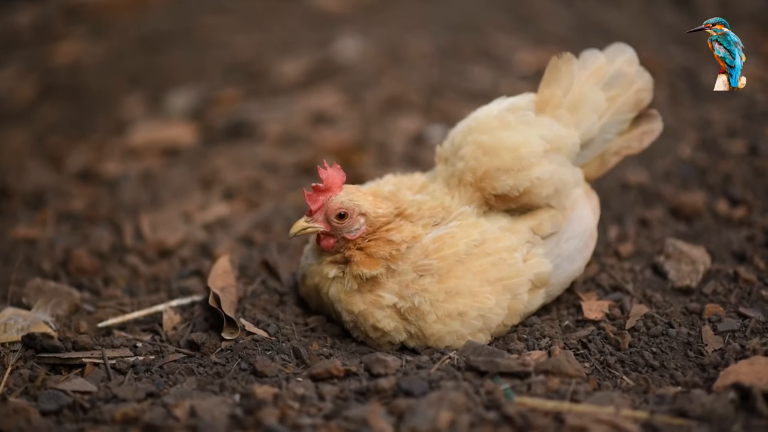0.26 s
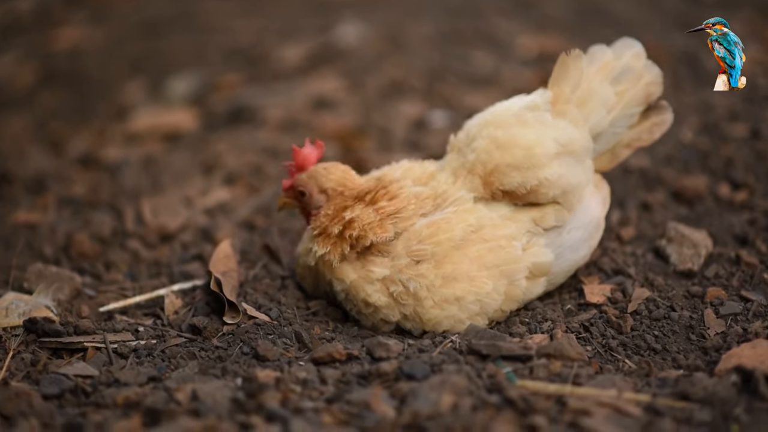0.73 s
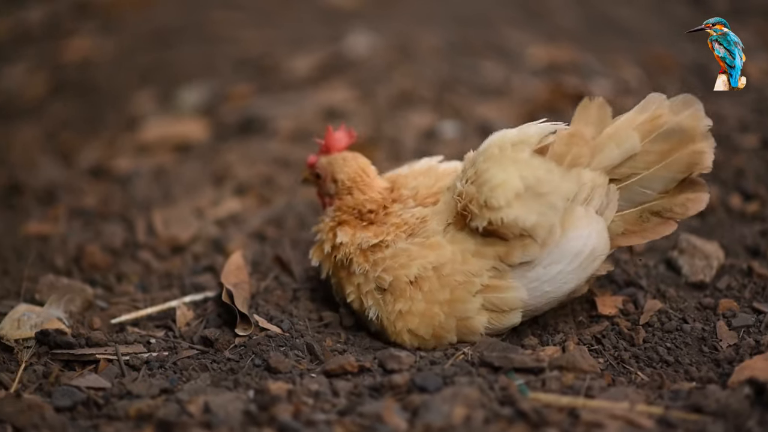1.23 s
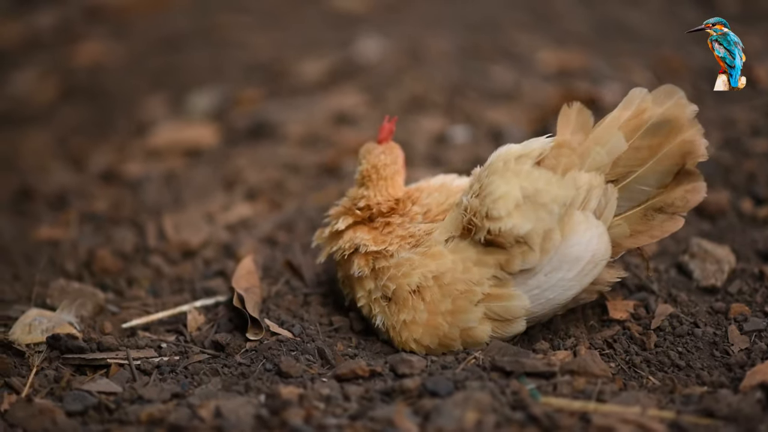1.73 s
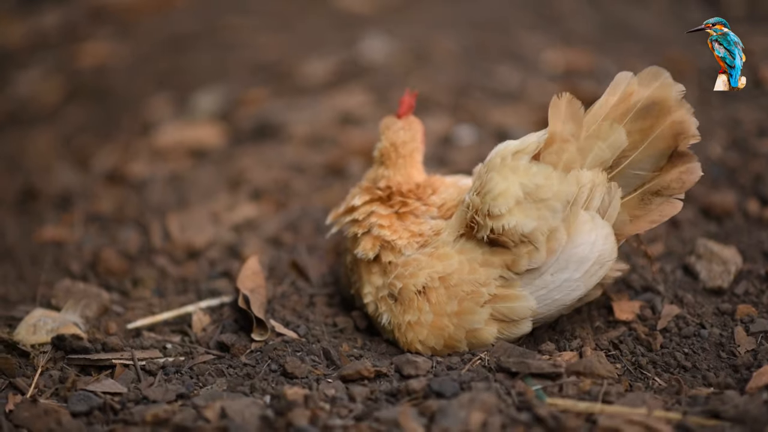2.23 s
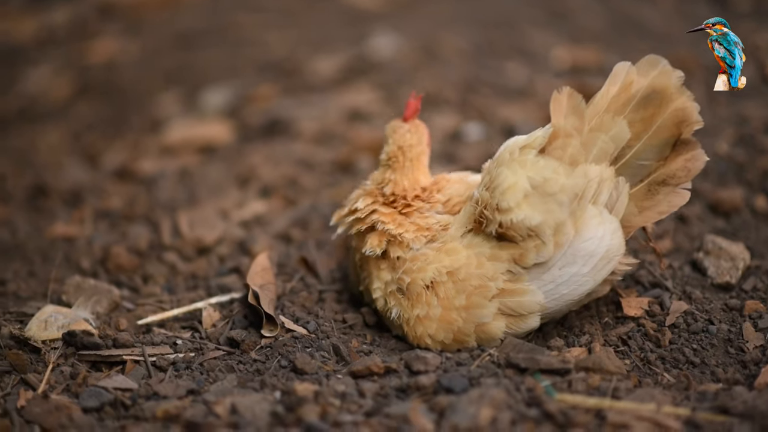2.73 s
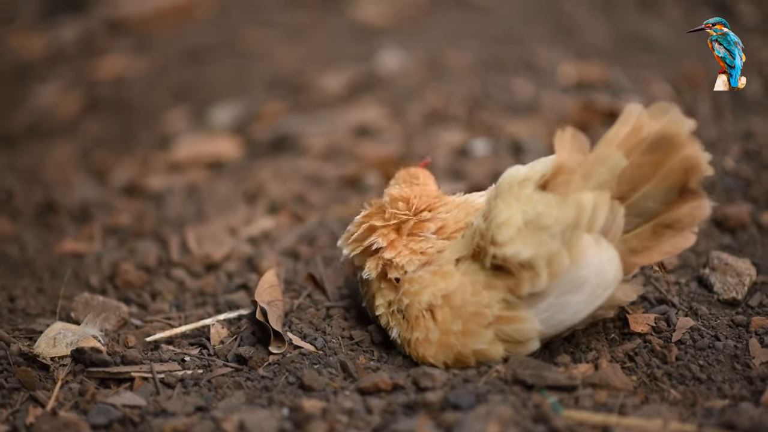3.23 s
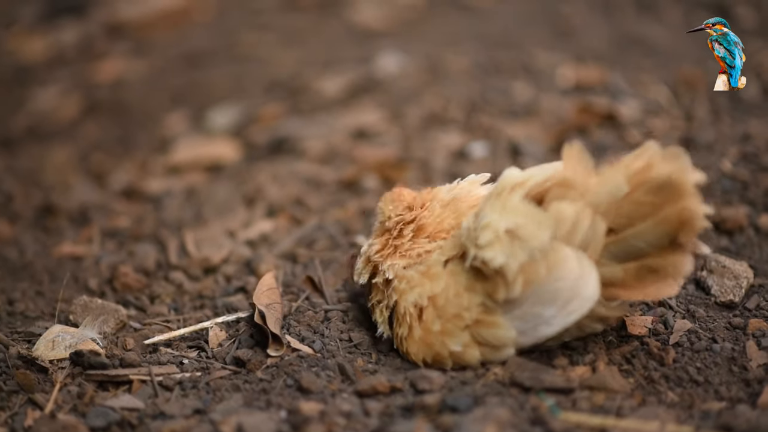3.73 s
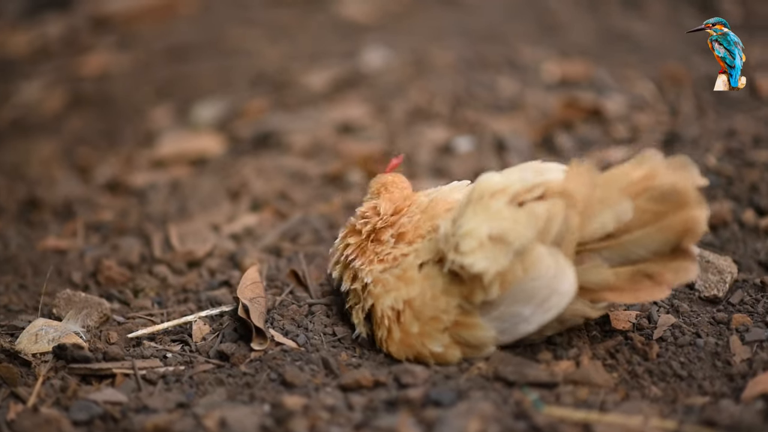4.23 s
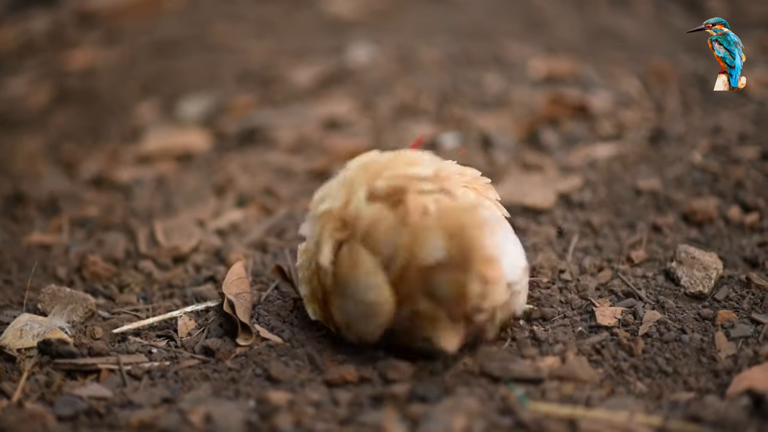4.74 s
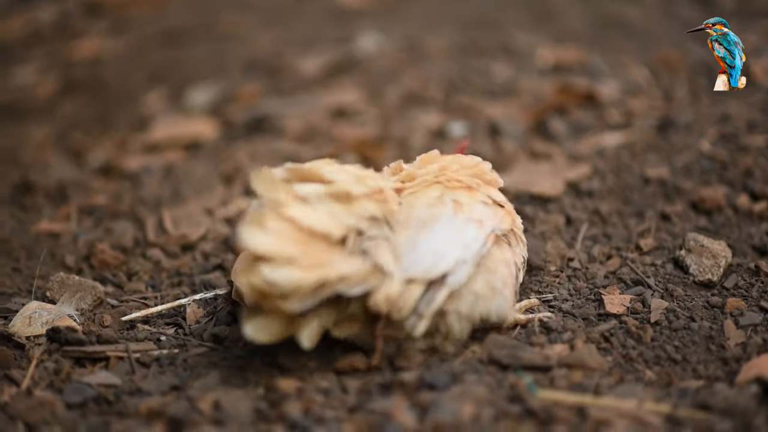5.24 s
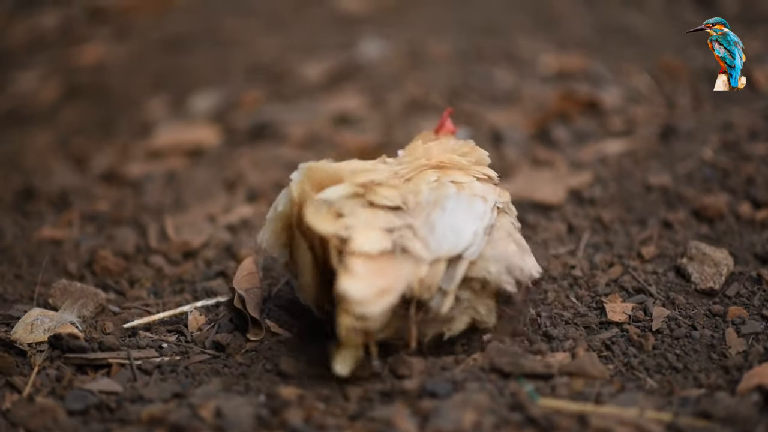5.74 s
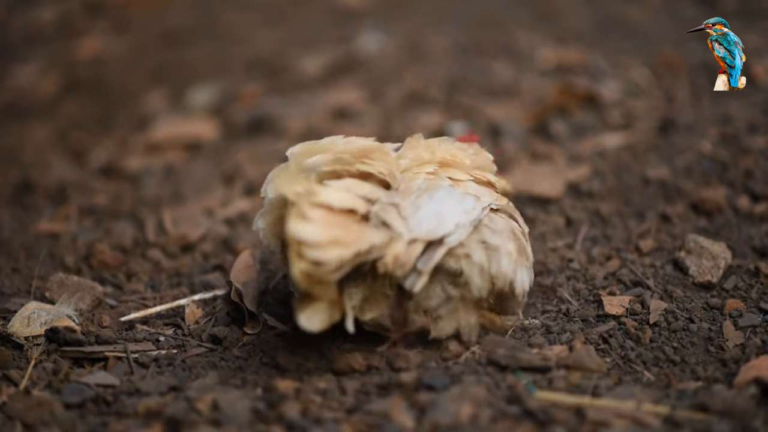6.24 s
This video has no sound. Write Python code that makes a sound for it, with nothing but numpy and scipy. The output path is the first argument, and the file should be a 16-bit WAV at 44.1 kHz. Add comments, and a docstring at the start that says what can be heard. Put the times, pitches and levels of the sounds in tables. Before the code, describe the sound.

A distant hen wails thinly, then a near hen gives four harsh strained squawks, followed by quiet clucks and feathers rustling in dry soil outdoors.

```python
"""Chickens in a farmyard

A near hen squawks: a pulse-driven syrinx flips between a rasp and a pure held note, ringing her throat.
A thinner-voiced bird further off calls first and last, from the same mechanism.
Soft clucks and far cheeps are short harmonic notes; feathers shuffling in dry soil are shaped noise.
Calls echo around the yard, over a faint outdoor rumble of filtered noise."""
import sys
import numpy as np
from scipy import signal
from scipy.fft import rfft, irfft, next_fast_len
from scipy.io import wavfile

SR = 44100
rng = np.random.default_rng(int(sys.argv[2]) if len(sys.argv) > 2 else 0)


def master_out(mix):
    """Clip the mix to full scale and print it as 16-bit PCM to the path in sys.argv[1]."""
    frames = np.transpose(np.atleast_2d(mix))
    ceiling = np.clip(frames, -1, 1)
    pcm = np.round(ceiling * 32767).astype(np.int16)
    wavfile.write(sys.argv[1], SR, pcm)


N = 285327
TIME = np.arange(N) / SR
CUTOFF_HZ = 15600


def from_db(db):
    """Decibels to gain."""
    return 10 ** (np.asarray(db) / 20)


def rms_one(x):
    """Scale to unit power."""
    return x / np.sqrt(np.mean(x ** 2) + 1e-20)


def in_time(rows, t):
    """Columns of a curve, interpolated at times t."""
    s, *columns = np.transpose(rows)
    return [np.interp(t, s, c) for c in columns]


def at_hz(rows, hz):
    """Columns of a spectrum, interpolated over log frequency."""
    points, *columns = np.transpose(rows)
    return [np.interp(np.log(hz + 1e-3), np.log(points), c) for c in columns]


def filtered(x, response):
    """Filter by a response given as a function of frequency."""
    size = next_fast_len(x.shape[-1] + 4096)
    spectrum = rfft(x, size) * response(np.fft.rfftfreq(size, 1 / SR))
    return irfft(spectrum, size)[..., :x.shape[-1]]


def drift(rate_hz, size):
    """Low-passed noise of unit power."""
    return rms_one(filtered(rng.standard_normal(size), lambda f: 1 / (1 + (f / rate_hz) ** 2)))


def local_rms(x, rate_hz):
    """Running level, following changes up to a given rate."""
    power = filtered(x ** 2, lambda f: np.exp(-(f / rate_hz) ** 2))
    return np.sqrt(np.abs(power) + 1e-12)


def evened(x, rate_hz):
    """Even out the bursts in a stereo sound, then hold its centre near level 1."""
    x = x / local_rms(x, rate_hz).mean(0)
    return x / local_rms(x.mean(0), 14)


# two microphone ports: freq_hz, left_lead_rad, left_minus_right_db
PORT_RESPONSE = [(300, 0, 0), (750, .2, 3.5), (1050, .55, 7), (1900, 1.8, 6.5), (2600, 1.6, 4),
                 (4300, 3.3, -.5), (5300, 4.7, 1), (6600, 6.1, 2), (9000, 6.6, 5), (12500, 6.9, 7.5)]


def ports(f):
    """Left and right response to a sound from the front, the difference split evenly."""
    lead_rad, balance_db = at_hz(PORT_RESPONSE, f)
    return (from_db(balance_db) * np.exp(1j * lead_rad)) ** np.array([[.5], [-.5]])


# diffuse sound: freq_hz, left_right_likeness (1 = identical)
DIFFUSE_LIKENESS = [(130, 1), (300, 1), (640, 0.96), (1400, 0.13), (3100, 0.066), (7000, 0.33), (15000, 1)]


def diffuse(size):
    """Stereo white noise from all around; likeness splits its power between mid and side."""
    def likeness(f):
        return np.clip(at_hz(DIFFUSE_LIKENESS, f)[0], -1, 1)

    mid = filtered(rng.standard_normal(size), lambda f: np.sqrt(1 + likeness(f)))
    side = filtered(rng.standard_normal(size), lambda f: np.sqrt(1 - likeness(f)))
    return np.array([mid + side, mid - side])


def harmonics(turns, pitch_hz, count=24):
    """Pulse train as equal harmonics, kept below the top cut."""
    return sum(np.cos(2 * np.pi * k * turns) * (k * pitch_hz < CUTOFF_HZ) for k in range(1, count + 1))


def throat(modes, f):
    """Steep-sided resonances; each one delays its band and smears the pulses."""
    detuned = [(f - hz) / (0.52 * width_hz) for hz, width_hz, db in modes]
    power = sum((from_db(db) / (1 + d ** 2)) ** 2 for (hz, width_hz, db), d in zip(modes, detuned))
    return np.sqrt(power) * np.exp(-2j * sum(np.arctan(d) for d in detuned))


EDGE_HZ = 5100   # body of a call below, treble edge above
BEAK_SLOPE = 7.5   # exponent of the bass cut in power


def squawk(voice, effort, modes, beak_hz, jitter, doubling, hiss, flutter_db, waver, steady_hz):
    """One call: the syrinx swings cleanly or breaks into chaotic pulses, and both ring the throat."""
    start_s, end_s = effort[0][0], effort[-1][0]
    span = (TIME > start_s - .005) & (TIME < end_s + .03)
    t = TIME[span]
    pitch_hz, rough = in_time(voice, t)
    rough = np.clip(rough, 0, 1)
    level_db, edge_db = in_time(effort, t)
    pitch_hz = pitch_hz * (1 + (0.0004 + waver * rough) * drift(90, len(t)))
    clean = harmonics(np.cumsum(pitch_hz) / SR, pitch_hz)

    # rasp: the period stumbles, strong and weak pulses alternate, air hisses through each opening
    turns = np.cumsum(pitch_hz * (1 + jitter * drift(350, len(t)))) / SR
    pulses = rms_one(harmonics(turns, pitch_hz)) * (1 + doubling * np.cos(np.pi * turns))
    breath = hiss * diffuse(len(t)) * (1 + np.cos(2 * np.pi * turns))
    rasp = (pulses + breath) * from_db(flutter_db * drift(500, len(t)))

    out = np.zeros((2, N))
    # strain brightens the treble edge independently of the body
    for slope, band_db in ((16, level_db), (-16, level_db + edge_db)):
        def colour(f):
            return throat(modes, f) * ports(f) / np.sqrt(1 + ((f + 1) / EDGE_HZ) ** slope)

        tone = evened(filtered(clean, colour), steady_hz)
        noise = evened(filtered(rasp, colour), steady_hz)
        out[:, span] += from_db(band_db) * (np.sqrt(1 - rough ** 2) * tone + rough * noise)
    # a beak is too small to radiate bass
    out[:, span] = filtered(out[:, span], lambda f: 1 / np.sqrt(1 + (beak_hz / (f + 1)) ** BEAK_SLOPE))
    return out * np.interp(TIME, [start_s - .005, start_s, end_s, end_s + 0.023], [0, 1, 1, 0])


ONSET_DB, RELEASE_DB = 26, 24   # depth of the swell and of the dying


def envelope(start_s, length_s, attack_s, release_s, fade_db_per_s):
    """A call swells, drifts in level while held, then dies: its times and its level in dB."""
    age_s = np.arange(0, length_s + release_s, .001)
    swell = np.clip(1 - age_s / attack_s, 0, 1) ** 2
    dying = np.maximum(age_s - length_s, 0) / release_s
    return start_s + age_s, -ONSET_DB * swell - RELEASE_DB * dying - fade_db_per_s * age_s


def ringing(sound, voice, least):
    """The part of a call that rings around the yard: rasps fully, pure notes mostly dry."""
    return sound * np.clip(in_time(voice, TIME)[1], least, 1)


YELP_ROUGH, RASP_ROUGH = 0.24, 0.98
BREAK_S, BREAK_HZ = .005, 815   # fall from the yelp into the rasp
SAG_HZ_PER_S = 24   # the pitch sinks as the hen tires
DROOP_LEAD_S, DROOP_S = .055, .075   # the droop begins before the release
CLEARING_DROOP = .29   # droop that halves the roughness
SLACK_LOSS_DB, SLACK_DULL_DB = 13, 16.5   # level and relative treble lost per unit of droop
OPENING_DULL_DB = 5   # relative treble missing at the opening
LOCK_FLIP_S, FLARE_S = .011, .12
LOCK_GAIN_DB, FLARE_COST = 1.83, .28   # body gained in a lock; body dB lost per dB of flare
# syrinx locks into a purer note: start_s, length_s, roughness (0-1), treble_flare_db
PURE_LOCKS = [(1.572, .071, .16, 4), (1.69, .078, .78, 1), (2.066, .253, .012, 11), (2.327, .1, .025, 1)]


def hen_gesture(start_s, length_s, attack_s, release_s, level_db, fade_db_per_s, edge_db,
                yelp_s, yelp_from_hz, yelp_to_hz, climb_s, held_hz, droop):
    """Yelp, break, climb, hold, droop: curves of (s, pitch, roughness) and (s, level, treble edge)."""
    t, shape_db = envelope(start_s, length_s, attack_s, release_s, fade_db_per_s)
    age_s, broken_s = t - start_s, yelp_s + BREAK_S
    yelp_hz = (yelp_from_hz - yelp_to_hz) * np.clip(1 - age_s / yelp_s, 0, 1) ** 1.3
    course_hz = np.interp(age_s, [yelp_s, broken_s, broken_s + climb_s], [yelp_to_hz, BREAK_HZ, held_hz])
    pitch_hz = yelp_hz + course_hz - SAG_HZ_PER_S * age_s
    slack = droop * np.clip((age_s - length_s + DROOP_LEAD_S) / DROOP_S, 0, 1)
    # the rasp sets in at the break and clears as the syrinx slackens
    rough = np.interp(age_s, [yelp_s, broken_s], [YELP_ROUGH, RASP_ROUGH])
    rough = rough / (1 + (slack / CLEARING_DROOP) ** 6)
    for lock_start_s, lock_s, lock_rough, flare_db in PURE_LOCKS:
        inside_s = np.minimum(t - lock_start_s, lock_start_s + lock_s - t)
        locked = np.clip(inside_s / LOCK_FLIP_S + .5, 0, 1)
        rough = rough + locked * (lock_rough - rough)
        flare = flare_db * np.exp(-np.abs(t - lock_start_s) / FLARE_S)
        edge_db = edge_db + locked * flare
        shape_db = shape_db + locked * (LOCK_GAIN_DB - FLARE_COST * flare)
    # the treble comes up after the body and goes first
    edge_db = edge_db - OPENING_DULL_DB * np.exp(-age_s / attack_s) - SLACK_DULL_DB * slack
    voice = np.c_[t, pitch_hz * (1 - slack), rough]
    return voice, np.c_[t, shape_db + level_db - SLACK_LOSS_DB * slack, edge_db]


# near hen's squawks: start_s, length_s, attack_s, release_s, level_db, fade_db_per_s, edge_db (re body),
# yelp_s, yelp_from_hz, yelp_to_hz, climb_s, held_hz, droop (0-1)
HEN_SQUAWKS = [(1.088, .155, 0.03, 0.058, -20.5, 5, -8.5, 0.021, 2139, 1244, 0.059, 958, 0.18),
               (1.364, 0.14, 0.017, 0.04, -18, 44, -11.5, .014, 1629, 1344, 0.014, 837.4, .1),
               (1.517, 0.31, .025, 0.1, -19.5, 8.5, -10, .012, 1564, 1548, .005, 1019, 0.02),
               (1.979, 0.63, 0.045, .05, -20, 3, -9.5, 0.02, 2761, 2505, 0.06, 980.4, .43)]
# bass cut of the small beak, one per squawk: cut_hz
HEN_BEAK_CUTS = (600, 713, 721, 580)
# throat resonances, beak half open: freq_hz, width_hz, level_db
HALF_OPEN_THROAT = [(838, 130, -16), (1755, 580, -5), (1810, 200, -4.5), (2430, 180, -8.5),
                    (2943, 600, -26.5), (3666, 120, -22), (5740, 880, -31), (6400, 250, -23),
                    (7510, 330, -11.5), (9080, 650, -21), (10200, 650, -32), (11970, 950, -34.5),
                    (14300, 1300, -41)]
# throat resonances, beak wide open: freq_hz, width_hz, level_db
WIDE_OPEN_THROAT = [(970, 300, -9.5), (1550, 620, -5), (2067, 150, 1), (2500, 450, -4), (3280, 810, -20.5),
                    (3952, 490, -10), (4820, 700, -35), (6880, 380, -18.5), (9150, 520, -11),
                    (9910, 500, -17.5), (11150, 1400, -23)]
# throat resonances, neck stretched: freq_hz, width_hz, level_db
STRETCHED_THROAT = [(722.5, 150, -20.5), (845, 680, -23), (1674, 710, -10.5), (1923, 100, 1),
                    (2340, 340, -9), (2860, 900, -31), (3690, 290, -19.5), (5265, 240, -29),
                    (6680, 240, -16), (7500, 140, -9.5), (8855, 205, -14), (9780, 2500, -36),
                    (11780, 110, -25.5), (14300, 1700, -43.5)]


def near_hen():
    """Squawks of a syrinx flipping between rasp and pure note: direct sound, and sound sent to the yard."""
    direct, sent = 0, 0
    throats = (HALF_OPEN_THROAT, WIDE_OPEN_THROAT, WIDE_OPEN_THROAT, STRETCHED_THROAT)
    for row, modes, beak_hz in zip(HEN_SQUAWKS, throats, HEN_BEAK_CUTS):
        voice, effort = hen_gesture(*row)
        call = squawk(voice, effort, modes, beak_hz, jitter=.055, doubling=.8, hiss=.2,
                      flutter_db=4.5, waver=.036, steady_hz=130)
        direct = direct + call
        sent = sent + ringing(call, voice, least=.15)
    return direct, sent


RASP_EDGE_DB = -9   # treble edge re body in the full rasp
CLEAR_GAIN_DB, CLEAR_EDGE_DB = 2.5, 12.5   # whole call gained, and relative treble gained, when clear


def thin_gesture(start_s, length_s, attack_s, release_s, level_db, fade_db_per_s, voice):
    """One thin call: the clearer the voice, the louder it is and the brighter."""
    t, shape_db = envelope(start_s, length_s, attack_s, release_s, fade_db_per_s)
    clear = 1 - np.clip(in_time(voice, t)[1], 0, 1)
    return voice, np.c_[t, shape_db + level_db + CLEAR_GAIN_DB * clear, RASP_EDGE_DB + CLEAR_EDGE_DB * clear]


# thin-voiced bird: start_s, length_s, attack_s, release_s, level_db, fade_db_per_s
THIN_BIRD_CALLS = [(0.023, 0.58, 0.052, .28, -37, 30), (5.969, .22, 0.097, .12, -48.5, 2),
                   (6.347, .124, 0.016, .1, -47, -48)]
# its first call, a wail: time_s, pitch_hz, roughness (0-1)
WAIL_COURSE = [(.085, 1160, 1), (.12, 1230, .65), (.15, 1228, .35), (.185, 1238, .14), (.23, 1203, .06),
               (.275, 1166, .15), (.30, 1136, .8), (.48, 1051, .95), (.78, 1006, .87)]
# throat in the wail: freq_hz, width_hz, level_db
WAIL_MODES = [(1119, 350, -11.5), (1507, 480, -15), (2530, 270, 0.5), (3060, 670, 0), (4365, 420, 2),
              (6240, 860, -2.5), (7020, 1900, -32), (9370, 910, -4.5), (12500, 1800, -19)]
# throat in the short calls: freq_hz, width_hz, level_db
SHORT_MODES = [(1176, 235, -8.5), (2570, 440, -0.5), (3350, 730, 1.5), (4560, 520, -1), (6740, 1100, -10.5),
               (9550, 1350, -9.5), (12500, 1600, -23)]
SHORT_FROM_HZ, SHORT_FROM_ROUGH = 1262, 0.84
SHORT_TO_HZ, SHORT_TO_ROUGH = 1315, 0.8
THIN_BEAK_HZ = 696


def thin_bird():
    """A wail and two short rising calls of a thin syrinx: direct sound, and sound sent to the yard."""
    direct, sent = 0, 0
    courses = [WAIL_COURSE]
    for start_s, length_s, *rest in THIN_BIRD_CALLS[1:]:
        courses.append([(start_s, SHORT_FROM_HZ, SHORT_FROM_ROUGH),
                        (start_s + length_s, SHORT_TO_HZ, SHORT_TO_ROUGH)])
    for row, course, modes in zip(THIN_BIRD_CALLS, courses, (WAIL_MODES, SHORT_MODES, SHORT_MODES)):
        voice, effort = thin_gesture(*row, course)
        call = squawk(voice, effort, modes, THIN_BEAK_HZ, jitter=0.058, doubling=0.75, hiss=.38,
                      flutter_db=3.5, waver=0.016, steady_hz=45)
        direct = direct + call
        sent = sent + ringing(call, voice, least=.45)
    return direct, sent


def short_notes(notes, modes, rise, jitter):
    """Brief, slightly rising harmonic notes through a throat, each under a half-sine swell."""
    out = np.zeros(N)
    for start_s, length_s, hz, db in notes:
        span = (TIME >= start_s) & (TIME < start_s + length_s)
        along = (TIME[span] - start_s) / length_s
        pitch_hz = hz * (1 + rise * (along - .5) + jitter * drift(130, len(along)))
        pulses = harmonics(np.cumsum(pitch_hz) / SR, pitch_hz, count=6)
        note = filtered(pulses, lambda f: throat(modes, f))
        out[span] += from_db(db) * rms_one(note) * np.sin(np.pi * along)
    return filtered(out, ports)


# soft clucks: start_s, pitch_hz, level_db
SOFT_CLUCKS = [(0.144, 325.3, -60.5), (.49, 314, -59), (.755, 338, -58), (3.222, 414, -56),
               (3.512, 285.4, -50.5), (3.856, 317.8, -45.5), (4.265, 384, -56), (4.612, 324, -59.5),
               (5.362, 337, -60.5), (5.51, 303, -60.5), (5.685, 308.6, -60.5)]
# cluck throat: freq_hz, width_hz, level_db
CLUCK_MODES = [(356, 440, -7.5), (647, 87, -2), (1010, 270, -16), (1477, 190, -20)]
CLUCK_S = 0.053


def soft_clucks():
    """Low, unsteady notes of one length through a low throat."""
    notes = [(start_s, CLUCK_S, hz, db) for start_s, hz, db in SOFT_CLUCKS]
    return short_notes(notes, CLUCK_MODES, rise=0.11, jitter=0.075)


# far cheeps and calls: start_s, length_s, pitch_hz, level_db
FAR_CHEEPS = [(.92, 0.083, 1650, -64), (3.21, .016, 8600, -53), (3.30, .025, 8600, -62),
              (3.42, .045, 1331, -65.5), (5.885, 0.064, 698, -58)]
# cheep throat: freq_hz, width_hz, level_db
CHEEP_MODES = [(702, 250, -6.5), (1468, 1400, -4), (8810, 380, -1)]


def far_cheeps():
    """Steadier short notes, low to very high, through a broad throat."""
    return short_notes(FAR_CHEEPS, CHEEP_MODES, rise=.02, jitter=.008)


# feather strokes in the soil: peak_s, length_s, level_db (before rustle_db)
SOIL_SHUFFLES = [(3.805, 0.24, -53), (4.40, .14, -58), (4.61, 0.085, -60.5), (4.78, 0.11, -50.5),
                 (4.95, 0.095, -54), (5.13, 0.057, -53.5), (5.307, 0.053, -54), (5.488, .06, -57),
                 (5.69, 0.11, -53), (5.85, .08, -56.5)]
# rustle colour: freq_hz, density_db (per Hz)
FEATHER_COLOUR = [(500, -5.5), (1200, -6), (2400, -5), (4500, -1.5), (7000, 1), (9300, 2), (13400, -10.5),
                  (15700, -12)]
# flicked grains: start_s, peak_db (before grit_db)
FLICKED_GRIT = [(0.8727, -36.5), (3.5243, -43), (4.9143, -40.5), (5.3136, -36), (5.875, -39)]
ROLL_START_S, ROLL_RISE_S, ROLL_DB = 4.5, 1, -59   # steady rustle once the hen rolls on her side
CRUMBS_PER_S, CRUMB_DB = 45, 26   # soil crackle: mean rate per channel, impulse gain


def dust_bath(grain_db, rustle_db, grit_db):
    """Feathers brush dry soil in clumps of grains: shaped noise swells per stroke and ticks per grain."""
    strokes = sum(from_db(db + rustle_db) * np.exp(-(2 * (TIME - peak_s) / length_s) ** 2)
                  for peak_s, length_s, db in SOIL_SHUFFLES)
    rolling = from_db(ROLL_DB) * np.clip((TIME - ROLL_START_S) / ROLL_RISE_S, 0, 1)
    ticks = sum(from_db(db + grit_db) * np.exp(-np.abs(TIME - start_s) / 0.0068) * (TIME >= start_s)
                for start_s, db in FLICKED_GRIT)
    crumbs = (rng.random(N) < CRUMBS_PER_S / SR) * from_db(CRUMB_DB) * rng.standard_normal((2, N))
    clumps = diffuse(N) * from_db(grain_db * drift(300, N))
    grains = filtered(clumps + crumbs, lambda f: from_db(at_hz(FEATHER_COLOUR, f)[0]) * ports(f))
    # slightly left
    return rms_one(grains) * (strokes + rolling + ticks) * from_db([[1.2], [-1.2]])


YARD_T60_S = 0.28


def yard(x, dull_hz, first_s, bright_db, bright_t60_s, late_db, late_t60_s):
    """Scattered echoes from ground, walls and trees, as decaying noise: dull, late and bright tails."""
    t = TIME[:SR]
    dull = filtered(diffuse(SR), lambda f: 1 / (1 + (f / dull_hz) ** 2))
    dull_decay = from_db(-60 * t / YARD_T60_S) + from_db(late_db - 60 * t / late_t60_s)
    bright = diffuse(SR) * from_db(bright_db - 60 * t / bright_t60_s)
    tail = (dull * dull_decay + bright) * (t > first_s)
    tail = tail / np.sqrt(np.sum(tail ** 2) / 2)
    return signal.fftconvolve(x, tail, axes=1)[:, :N]


# outdoor air: freq_hz, density_db (per Hz)
AIR_COLOUR = [(15, -55.5), (25, -36), (48, -1), (119, -1.5), (189, -9.5), (228, -10), (332, -14.5),
              (472, -19), (570, -18), (1210, -16.5), (1500, -16.5), (1970, -18), (3370, -21), (8670, -22.5),
              (15700, -38.5)]
AIR_DB = -57.5


def open_air():
    """Steady diffuse noise, strongest in the bass: a faint outdoor rumble."""
    return from_db(AIR_DB) * rms_one(filtered(diffuse(N), lambda f: from_db(at_hz(AIR_COLOUR, f)[0])))


def scene():
    """Both birds, the rest of the flock, their echoes, the dust bath and the open air."""
    hen, hen_sent = near_hen()
    thin, thin_sent = thin_bird()
    flock = soft_clucks() + far_cheeps()
    sent = from_db(-7.5) * hen_sent + from_db(2.5) * thin_sent + from_db(-10) * flock
    echoes = yard(sent, dull_hz=3900, first_s=0.0057, bright_db=1.5, bright_t60_s=0.42,
                  late_db=-25.5, late_t60_s=1.0)
    soil = dust_bath(grain_db=2.5, rustle_db=-1.5, grit_db=-15)
    return hen + thin + flock + soil + echoes + open_air()


def record(dry):
    """Cut the top steeply."""
    return filtered(dry, lambda f: 1 / np.sqrt(1 + (f / CUTOFF_HZ) ** 300))


dry = scene()
out = record(dry)
master_out(out)
```